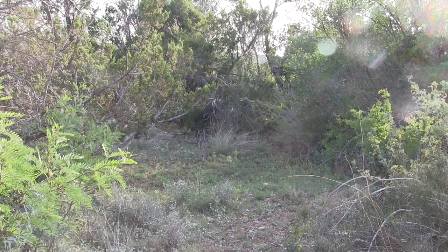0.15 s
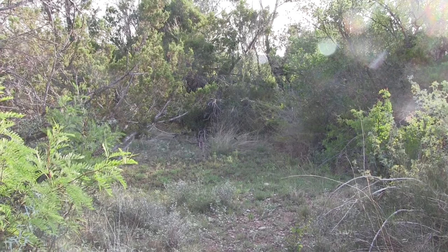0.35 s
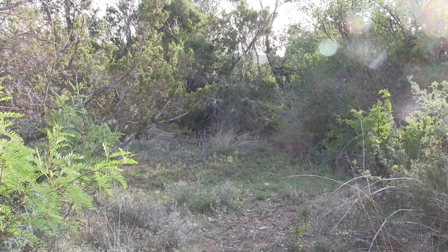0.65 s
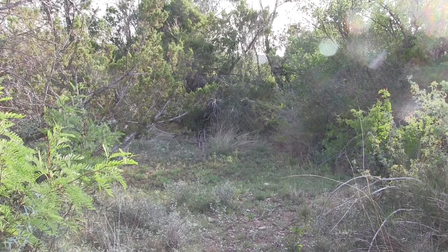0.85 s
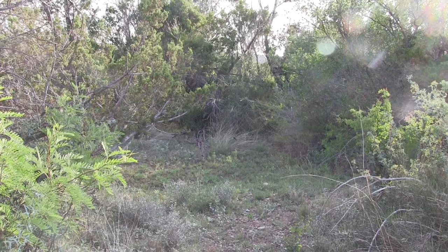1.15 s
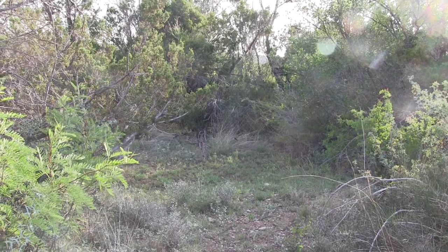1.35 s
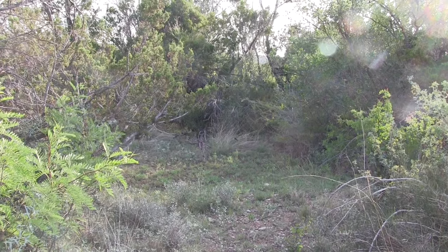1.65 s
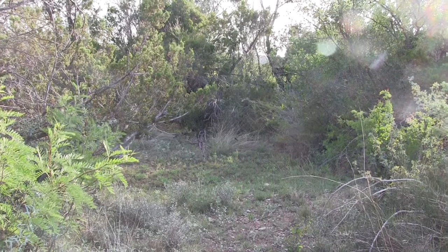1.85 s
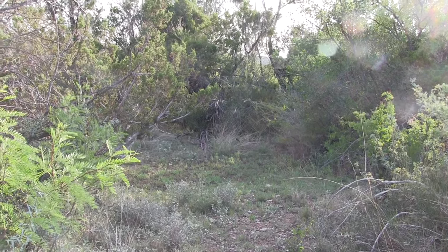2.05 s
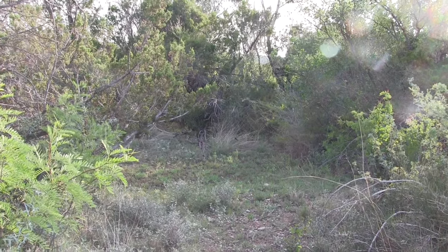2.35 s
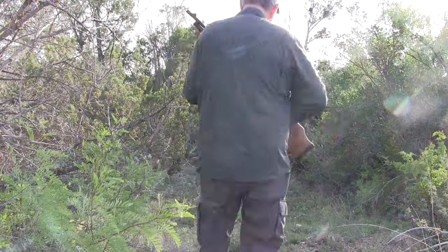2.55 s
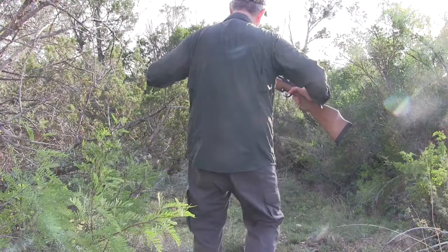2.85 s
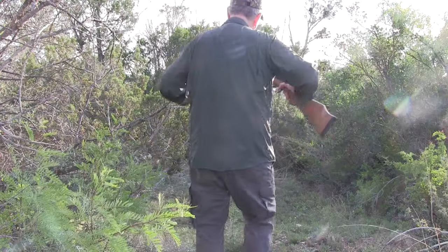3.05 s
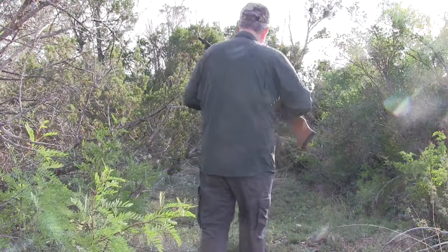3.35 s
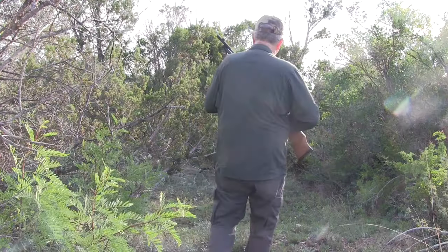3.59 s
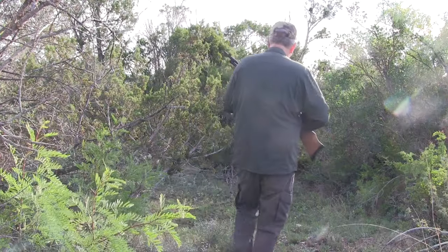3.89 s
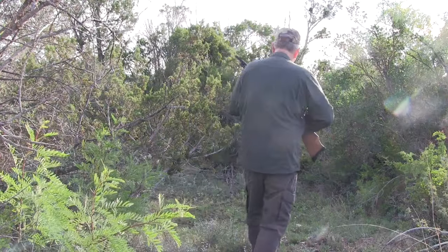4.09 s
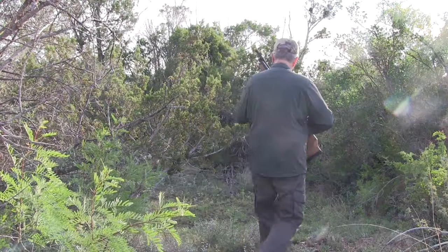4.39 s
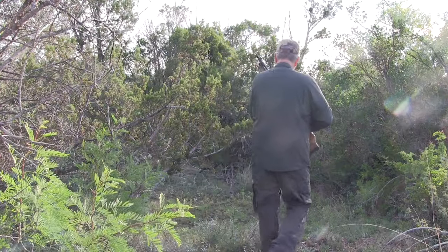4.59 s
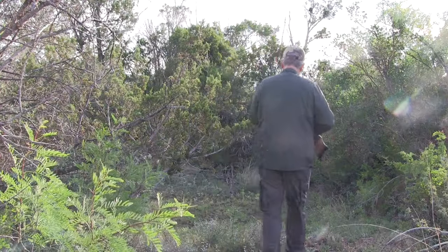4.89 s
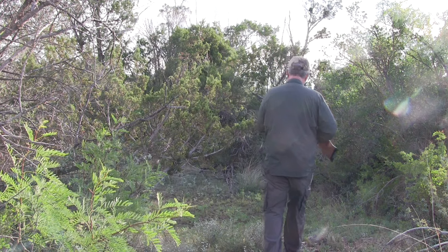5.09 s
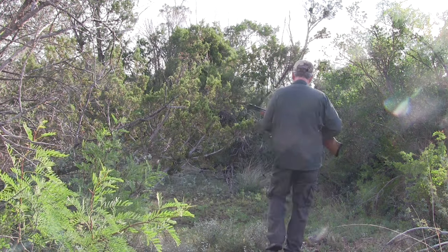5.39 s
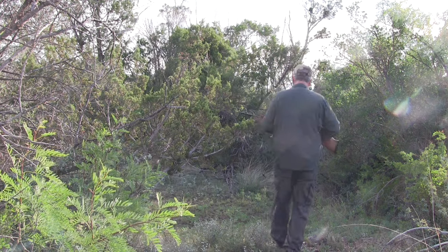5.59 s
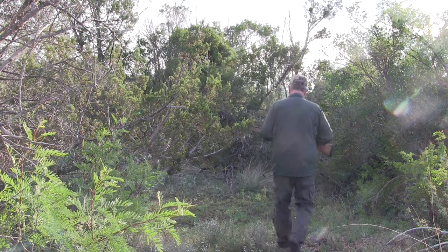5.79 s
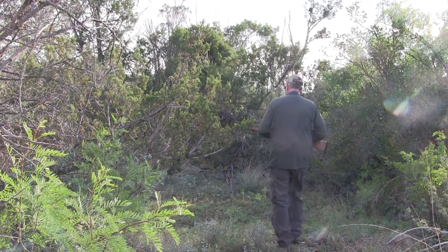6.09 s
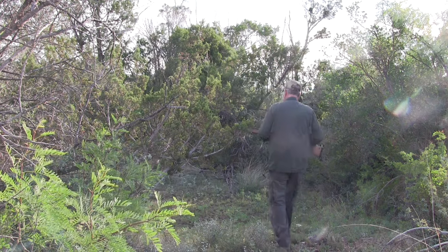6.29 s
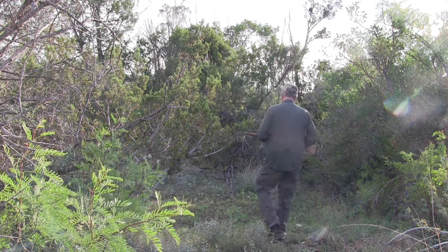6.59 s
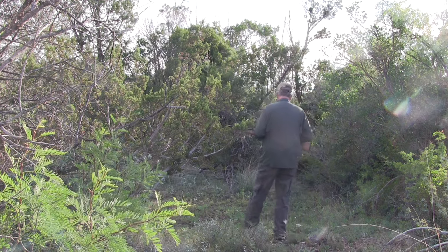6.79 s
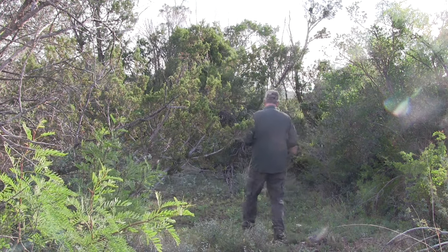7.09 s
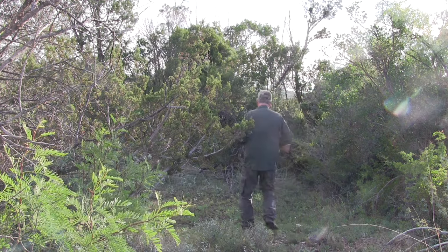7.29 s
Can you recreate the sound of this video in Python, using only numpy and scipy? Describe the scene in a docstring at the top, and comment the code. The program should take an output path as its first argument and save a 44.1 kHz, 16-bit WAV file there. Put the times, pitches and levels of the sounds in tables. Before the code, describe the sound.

Outdoors in quiet scrub, an air rifle fires at once, very close and clipped-sharp, with a quick pellet strike and a short rattle dying into the bushes. Small creaks and low wind thumps follow on the stereo microphone. After a tiny drop-out come hard reloading clacks with a brief steel ring, then boots rustle away over dry litter, twigs snapping, one loud clack, and a bird warbling faintly.

```python
"""Open brush, where an air rifle fires beside a camera: sharp pressure fronts, a strike, and noise from the scrub.
The camera mount creaks as slips drive its resonances, while slow noise and single gusts thump on both microphone ports.
Around a short drop-out the rifle is reloaded with clacks, noise blows through stock resonances and a ringing latch.
Boots walk off through dry brush in grainy noise swells and twig snaps; a songbird warbles in gliding sines."""
import sys
import numpy as np
from scipy import signal
from scipy.fft import rfft, irfft, next_fast_len
from scipy.io import wavfile
from scipy.ndimage import map_coordinates

SR = 44100
rng = np.random.default_rng(int(sys.argv[2]) if len(sys.argv) > 2 else 0)


def waveform_to_disk(signal):
    """Save audio, clipped to [-1, 1], as 16-bit WAV at the path in sys.argv[1]."""
    frames = np.transpose(np.atleast_2d(signal))
    scaled = np.clip(frames, -1, 1) * 32767
    samples = np.round(scaled).astype(np.int16)
    wavfile.write(sys.argv[1], SR, samples)


N = 328104  # length in samples

# Still open air. Each row: frequency in Hz, relative density in dB per Hz.
AIR_SPECTRUM = [(50, -21), (100, 0), (1500, -6), (13000, -21.5), (16200, -33.5)]
# Left-right correlation of air and brush. Each row: frequency in Hz, correlation.
FIELD_CORRELATION = [(60, 0.82), (400, 0.25), (2400, 0.86)]

# Wind level over time. Each row: time in seconds, level in dB.
WIND_LEVEL = [(0, -52.5), (.5, -57), (2.6, -47), (3.3, -55.5), (3.5, -66), (7.44, -71)]
# Buffeting noise. Each row: frequency in Hz, relative density in dB per Hz.
BUFFET_SPECTRUM = [(15, -39.5), (60, 0), (140, -2), (270, -19), (420, -48.5)]
# Single gusts on the ports. Each row: start in seconds, level in dB.
GUSTS = [(0.83, -36.5), (1.139, -34.5), (1.542, -32), (2.24, -29), (2.362, -33.5)]

# Shot fronts, direct and mirrored by ground and trunks. Each row: time in seconds, level in dB.
PRESSURE_FRONTS = [(.06455, -1), (.06765, -1), (.0706, -2.5), (.07855, -5.5), (.0815, -12)]
FRONT_MS = .21  # time scale of one front, milliseconds
# Low push of the escaping air: start in seconds, size before damping in dB, frequency in Hz.
AIR_PUSH = (.0645, -11, 320)
# The pellet's strike, then its thud. Each row: start in seconds, size before damping in dB, frequency in Hz.
PELLET_STRIKE = [(.1693, -9.5, 4050), (0.1715, -22, 400)]
# Noise burst on every front: boom re front in dB, treble re front in dB,
# seconds to rise 60 dB, seconds to fall 60 dB.
FRONT_TURBULENCE = (-21, -21, .002, .015)
# The hammer's travel, the rattle of the action, three clumps of near scrub, then far trees.
# Each row: peak in seconds, boom in dB, treble in dB, seconds to rise 60 dB, seconds to fall 60 dB.
SHOT_NOISES = [(.054, -29, -42, .004, .13), (.063, -19, -18.5, .003, .095), (.123, -40, -44, .03, .07),
               (.149, -34, -41, .05, .15), (.19, -37, -42, .2, .3), (.36, -60, -68, .5, .7)]
TRIGGER_S = .051  # no shot noise before this time, seconds
# Boom of the shot. Each row: frequency in Hz, relative density in dB per Hz.
BOOM_SPECTRUM = [(120, -39), (320, 2), (800, -12), (1800, 0), (3500, -5), (6500, -30)]
# Near treble of the shot. Each row: frequency in Hz, relative density in dB per Hz.
FIZZ_SPECTRUM = [(1800, -30.5), (3000, -1), (10000, 1.5), (16000, -10)]
# Left-right correlation of the shot noise. Each row: frequency in Hz, correlation.
SHOT_CORRELATION = [(2400, 0.8), (4000, 0.46), (7500, .1), (11000, 0.97)]

# Resonances of the camera mount. Each row: frequency in Hz, width in Hz, relative level in dB,
# width and level being those of a single pass.
MOUNT_MODES = [(340, 90, -1), (620, 120, 0), (790, 190, 1)]
# A mode that the slips reach to differing degrees. Each row: the same columns as the mount resonances.
UPPER_MODES = [(1590, 170, 0)]
# Slips of the joint. Each row: peak in seconds, level in dB, seconds to rise 60 dB, upper mode re slip in dB.
MOUNT_SLIPS = [(.75, -42.5, .004, -6), (.818, -46, .03, -6), (.845, -42.5, .12, -7), (1.0, -45, .015, -14),
               (1.512, -41.5, .1, -18)]
SLIP_T60_S, SETTLE_DB, SETTLE_T60_S = .1, -12, .9  # a slip dies fast (s), its settling (dB re slip) slowly (s)
# Clicks as the joint comes free. Each row: start in seconds, level in dB, frequency in Hz.
JOINT_TICKS = [(1.499, -43, 2400), (2.213, -45, 600), (2.243, -41, 700)]
# Soft rubbing on the mount. Each row: start in seconds, length in seconds.
MOUNT_RUBS = [(1.68, .14), (1.83, .27), (2.27, .23)]
RUB_DB = -58

# Knocks on the rifle. Each row: start in seconds, level in dB, 60 dB decay in seconds,
# knock frequency in Hz, treble re knock in dB.
RIFLE_CLACKS = [(2.436, -31.5, 0.024, 2330, -6), (2.586, -32, .04, 1000, -16),
                (2.613, -13, 0.058, 1450, -4.5), (2.672, -33, 0.04, 1800, -10),
                (2.751, -17, 0.065, 800, -13.5), (2.859, -13.5, 0.072, 1670, -4.5),
                (2.995, -37.5, .06, 1200, -10), (3.071, -33, 0.036, 745, -31),
                (3.363, -38, 0.042, 2180, -23), (4.628, -25, 0.27, 1500, -16),
                (4.6447, -2, 0.016, 1900, -27)]
CLACK_RISE_S = .0015
# Resonances of the wooden stock. Each row: frequency in Hz, width in Hz, relative level in dB.
STOCK_MODES = [(350, 110, -.5), (615, 140, 2), (990, 200, 1), (1275, 190, 4.5), (2200, 380, 2.5),
               (3260, 380, 0)]
# Partials of the steel latch. Each row: frequency in Hz, relative level in dB, 60 dB decay in seconds.
LATCH_PARTIALS = [(1866, -.5, 0.24), (6020, -10, .2)]
# The blow that frees the latch to ring: start in seconds, level in dB.
LATCH_BLOW = (2.861, -32)

# Shuffling while the rifle is handled. Each row: start in seconds, length in seconds,
# sole tread in dB, leaf swish in dB.
HANDLING_SHUFFLES = [(2.5, .12, -49, -49), (2.599, 0.194, -51.5, -53.5), (3.05, 0.16, -59, -58)]
# Strides through the brush. Each row: start in seconds, length in seconds, leaf swish in dB.
BRUSH_STRIDES = [(3.46, 0.16, -63), (3.603, 0.5, -53.5), (4.223, 0.36, -66.5), (4.728, .12, -57.5),
                 (5.07, .14, -63.5), (5.225, 0.16, -63), (5.54, 0.13, -59), (5.717, 0.25, -70),
                 (6.33, 0.15, -77), (6.78, 0.18, -61.5), (7.0, .18, -72)]
SOLE_DB, FARTHER_DB_PER_S = -55, -.7  # tread at the first stride, and its change as the boots walk away
# Soles on litter. Each row: frequency in Hz, relative density in dB per Hz.
TREAD_SPECTRUM = [(90, -32.5), (220, -0.5), (650, 1), (2300, -13), (6000, -34)]
# Leaves, swept by legs or returning the shot. Each row: frequency in Hz, relative density in dB per Hz.
LEAF_SPECTRUM = [(900, -29), (1600, -7), (3400, -3), (9400, -12), (16000, -28.5)]

# Twigs under the boots. Each row: start in seconds, level in dB, knock frequency in Hz.
TWIG_SNAPS = [(3.574, -28, 2200), (3.793, -23, 500), (3.916, -37, 1500), (4.283, -43, 520),
              (4.34, -37, 900), (4.385, -38, 1030), (5.083, -43, 600), (5.308, -41, 1100),
              (5.44, -44, 1440), (5.642, -44, 620), (5.862, -38, 500), (6.021, -42, 400), (6.36, -33, 600),
              (6.445, -41, 900), (7.046, -42, 470), (7.097, -42, 800)]
TWIG_RISE_S, TWIG_CYCLES = .00065, 19  # a snap falls 60 dB within so many cycles of its knock
TWIG_TREBLE_DB, DULLER_DB_PER_S = -1.5, -10  # crack re knock at the first twig, and its change over time

# Slurs that slide toward a resting pitch. Each row: start in seconds, length in seconds,
# first frequency in Hz, resting frequency in Hz, level in dB.
BIRD_SLURS = [(5.373, .026, 2800, 2810, -61), (6.948, .078, 3400, 3390, -50), (7.375, .1, 2290, 2320, -55),
              (6.098, .04, 1680, 1580, -61), (6.627, .02, 3350, 1800, -59), (5.70, .052, 2350, 1900, -61),
              (6.002, .02, 2780, 3150, -60), (6.152, .065, 2800, 1830, -57), (6.281, .027, 2720, 2150, -58),
              (5.026, .032, 4100, 2350, -65), (5.056, .022, 2800, 4700, -66),
              (6.488, .085, 2680, 1920, -58), (6.711, .08, 2620, 1920, -59), (7.084, .02, 3850, 2850, -57),
              (7.223, .095, 2560, 1950, -62)]
GLIDE_S = .022  # time constant of the slide, seconds
# Whistles bent through three pitches. Each row: start in seconds, length in seconds,
# first, middle and last frequency in Hz, level in dB.
BIRD_WHISTLES = [(4.866, .05, 4200, 4050, 3650, -69.5), (5.157, .06, 3400, 2720, 2600, -64.5),
                 (5.427, .064, 3400, 2700, 2620, -57.5), (5.972, .033, 2400, 2260, 3200, -62),
                 (5.655, .052, 2300, 2430, 2330, -53), (5.884, .07, 3000, 2330, 1930, -55),
                 (6.31, .045, 3400, 3190, 3400, -53), (6.403, .056, 4350, 3950, 3100, -63),
                 (6.65, .053, 2560, 2790, 2880, -52), (6.883, .04, 2700, 2540, 2640, -52),
                 (7.112, .062, 2700, 2720, 2900, -51)]

# The drop-out: start in seconds, end in seconds.
DROP_OUT = (2.502, 2.518)
TOP_HZ = 16100  # upper band limit


def amp(db):
    """Convert a level in dB to an amplitude ratio."""
    return 10 ** (np.asarray(db) / 20)


def unit(x):
    """Normalise x to a root-mean-square of 1."""
    return x / np.sqrt(np.mean(x ** 2) + 1e-20)


def along(points, hz):
    """Interpolate (Hz, value) points on a logarithmic frequency axis."""
    f, v = np.transpose(points)
    return np.interp(np.log(hz + 1), np.log(f + 1), v)


def curves(rows):
    """Interpolate each column after the time linearly, one value per sample."""
    s, *cols = np.transpose(rows)
    return [np.interp(np.arange(N) / SR, s, c) for c in cols]


def wobble(rate, size=N):
    """Random modulation: a smooth curve through normal deviates, rate knots a second."""
    knots = rng.standard_normal(int(size * rate / SR) + 4)
    return map_coordinates(knots, [np.arange(size) * rate / SR])


def peak(s, rise, fall):
    """Exponential growth and decay: gain 1 at s seconds, 60 dB up in rise and 60 dB down in fall seconds."""
    t = np.arange(N) / SR - s
    return amp(60 * np.minimum(t / rise, -t / fall))


def filtered(x, response):
    """Linear filtering: multiply the spectrum of x by a complex response of frequency."""
    m = next_fast_len(x.shape[-1] + 8192)
    return irfft(rfft(x, m) * response(np.fft.rfftfreq(m, 1 / SR)), m)[..., :x.shape[-1]]


def body(modes):
    """Modal superposition: causal response of (Hz, width, dB) resonances of alternating sign."""
    def response(f):
        return sum((-1) ** k * amp(db) * 1j * f * w / (c * c - f * f + 1j * f * w)
                   for k, (c, w, db) in enumerate(modes))
    return response


def rush(spectrum, alike, grain_db, rate):
    """Partly correlated stereo noise of rms 1, broken into grains by a fast random gain."""
    pair = rng.standard_normal((2, N)) * amp(grain_db * wobble(rate))

    def mid_side_gains(hz):
        turn = np.arccos(np.clip(along(alike, hz), -1, 1)) / 2  # the mid-side balance sets the correlation
        return amp(along(spectrum, hz)) * [np.cos(turn), np.sin(turn)]
    mid, side = filtered(pair, mid_side_gains)
    return unit(np.array([mid + side, mid - side]))


def add(out, s, sound):
    """Superpose a sound on out, starting at s seconds."""
    part = out[..., round(s * SR):][..., :sound.shape[-1]]
    part += sound[..., :part.shape[-1]]


def burst(rise, t60, low, treble_db):
    """Impact noise: a ragged decaying blow through a low response, its brighter crack partly unlike left to right."""
    t = np.arange(SR // 4) / SR
    shape = np.minimum(t / rise, 1) * amp(-60 * np.maximum(t - rise, 0) / t60)
    energy = np.linalg.norm(shape) / 2
    rattle_db = np.minimum(t / 0.026, 1) * 4 * wobble(130, size=len(t))  # the tail breaks up into rattles
    shape = shape * amp(rattle_db)
    knock = filtered(shape * rng.standard_normal(len(t)), low)
    hiss = rng.standard_normal(len(t)) + 0.47 * rng.standard_normal((2, len(t)))
    crack = filtered(shape * hiss, lambda f: body([(4800, 8000, 0)])(f) ** 3)
    return energy * (knock / np.linalg.norm(knock) + amp(treble_db) * crack / np.linalg.norm(crack[0]))


def open_air():
    """Diffuse background: a nearly steady broadband hiss, partly correlated between the sides."""
    return amp(-59) * rush(AIR_SPECTRUM, FIELD_CORRELATION, .3, 42)


def wind():
    """Pressure fluctuation: lumpy low noise, unlike on the two ports, and single gusts of about two cycles."""
    lumps = amp(4.5 * np.array([wobble(11), wobble(11)]))
    buffeting = unit(lumps * rush(BUFFET_SPECTRUM, [(90, .25)], 1.96, 18))
    out = amp(curves(WIND_LEVEL)[0]) * buffeting
    for s, db in GUSTS:
        gust_hz = 120 * np.exp(rng.normal(0, 0.17))
        cycles = np.arange(SR // 20) * gust_hz / SR
        phase = rng.uniform(0, 2 * np.pi) + rng.normal(0, 0.84, (2, 1))
        puff = np.exp(-((cycles - 1.2) / 0.64) ** 2) * np.sin(2 * np.pi * cycles + phase)
        add(out, s, amp(db) * puff)
    return out


def shot():
    """Impulsive radiation: steep suction and slower overshoot at each front, with noise for rattle and scrub."""
    fronts, t = np.zeros(N), np.arange(-100, 400) / SR
    for s, db in PRESSURE_FRONTS:
        u = 1000 * t / FRONT_MS
        suction = -np.exp(-u * u)
        overshoot = 0.72 * np.exp(-.5 * u) * np.cos(.5 * u)
        add(fronts, s + t[0], amp(db) * np.where(u < 0, suction, overshoot))
    for s, db, hz in PELLET_STRIKE + [AIR_PUSH]:
        cycles = np.arange(SR // 50) * hz / SR
        add(fronts, s, -amp(db) * np.exp(-.9 * cycles) * np.sin(2 * np.pi * cycles))
    # a small muzzle sends out no deep bass
    fronts = filtered(fronts, lambda hz: (1j * hz / (150 + 1j * hz)) ** 2)

    boom_db, treble_db, rise, fall = FRONT_TURBULENCE
    bursts = [(s, db + boom_db, db + treble_db, rise, fall) for s, db in PRESSURE_FRONTS]

    def envelopes(rows):
        return sum(amp([[boom], [treble]]) * peak(s, up, down) for s, boom, treble, up, down in rows)
    near_boom, near_treble = envelopes(SHOT_NOISES[:2] + bursts)
    far_boom, far_treble = envelopes(SHOT_NOISES[2:])
    noise = (near_boom + far_boom) * rush(BOOM_SPECTRUM, SHOT_CORRELATION, 3.2, 200)
    noise = noise + near_treble * rush(FIZZ_SPECTRUM, SHOT_CORRELATION, 0.9, 417)
    noise = noise + far_treble * rush(LEAF_SPECTRUM, SHOT_CORRELATION, 2, 417)  # leaves return it duller
    return fronts + noise * (np.arange(N) > TRIGGER_S * SR)


def creak():
    """Stick-slip friction: uneven slips of the joint drive mount resonances that each come and go on their own."""
    slips = rng.standard_normal((2, N)) * amp(2.5 * wobble(120))

    def driven(modes):
        total = 0
        for mode in modes:
            force = amp(2.5 * wobble(25)) * (slips + .3 * slips[::-1])  # some of each side leaks across
            total = total + filtered(force, lambda f: body([mode])(f) ** 2)
        return unit(total)
    low, upper = driven(MOUNT_MODES), driven(UPPER_MODES)
    low_gain, upper_gain = np.zeros((2, N))
    for s, db, rise, upper_db in MOUNT_SLIPS:
        envelope = peak(s, rise, SLIP_T60_S) + amp(SETTLE_DB) * peak(s, rise, SETTLE_T60_S)
        low_gain += amp(db) * envelope
        upper_gain += amp(db + upper_db) * envelope
    rub = np.zeros(N)
    for s, length in MOUNT_RUBS:
        add(rub, s, amp(RUB_DB) * np.sqrt(np.hanning(int(length * SR))))
    rubbing = rub * unit(filtered(slips, body(MOUNT_MODES + UPPER_MODES)))
    out = low_gain * low + upper_gain * upper + rubbing
    for s, db, hz in JOINT_TICKS:
        tick = burst(TWIG_RISE_S, .02, lambda f: body([(hz, 2 * hz, 0)])(f) ** 2, -25)
        add(out, s, amp(db) * tick)
    return out


def rifle():
    """Struck-body resonance: knocks shake the stock, most near their own pitch; one blow rings the steel latch."""
    out, t = np.zeros((2, N)), np.arange(SR // 4) / SR
    for s, db, t60, hz, treble_db in RIFLE_CLACKS:
        wood = lambda f: (body(STOCK_MODES)(f) + 0.17) * body([(hz, 1.9 * hz, 0)])(f) ** 2
        add(out, s, amp(db) * burst(CLACK_RISE_S, t60, wood, treble_db))
    ring = np.zeros(len(t))
    for hz, level, decay in LATCH_PARTIALS:
        level_db = level - 60 * t / decay + hz / 1500 * wobble(60, size=len(t))
        phase = 2 * np.pi * hz * t + hz / 5000 * wobble(300, size=len(t))
        ring += amp(level_db) * np.sin(phase)
    start, db = LATCH_BLOW
    add(out, start, amp(db) * ring)
    return out


def scrub(x, t60):
    """Diffuse scattering: bushes return a dull, delayed, dying tail, unlike on the two sides."""
    t = np.arange(SR // 2) / SR
    tail = filtered(rng.standard_normal((2, len(t))) * amp(-60 * t / t60), body([(1940, 13400, 0)]))
    delayed = np.pad(x, (700, 0))[None]  # 700 samples of delay
    return signal.fftconvolve(delayed, tail / np.linalg.norm(tail[0]), axes=1)[:, :N]


def brush():
    """Granular friction: soles grind the litter and legs sweep the leaves in grainy swells."""
    tread, swish = np.zeros((2, N))
    first_s = BRUSH_STRIDES[0][0]
    steps = [(s, length, SOLE_DB + FARTHER_DB_PER_S * (s - first_s), db) for s, length, db in BRUSH_STRIDES]
    for s, length, tread_db, swish_db in HANDLING_SHUFFLES + steps:
        swell = np.sin(np.pi * np.linspace(0, 1, int(length * SR)) ** 0.83)
        add(tread, s, amp(tread_db) * swell)
        add(swish, s, amp(swish_db) * swell)
    grind = tread * rush(TREAD_SPECTRUM, FIELD_CORRELATION, 6, 300)
    sweep = swish * rush(LEAF_SPECTRUM, FIELD_CORRELATION, 3.0, 500)
    return grind + sweep


def twigs():
    """Brittle fracture: dry snaps, each a knock with a crack on top, duller as the boots walk off."""
    out = np.zeros((2, N))
    for s, db, hz in TWIG_SNAPS:
        treble_db = TWIG_TREBLE_DB + DULLER_DB_PER_S * (s - TWIG_SNAPS[0][0])
        knock = lambda f: body([(hz, 1.4 * hz, 0)])(f) ** 2
        add(out, s, amp(db) * burst(TWIG_RISE_S, TWIG_CYCLES / hz, knock, treble_db))
    return out


def bird():
    """Frequency modulation: swelling and fading sines; slurs relax toward a pitch, whistles follow a parabola."""
    out, notes = np.zeros(N), []
    for s, length, first_hz, rest_hz, db in BIRD_SLURS:
        slide = np.exp(-np.arange(int(length * SR)) / (GLIDE_S * SR))
        notes.append((s, db, .55, rest_hz + (first_hz - rest_hz) * slide))
    for s, length, first_hz, mid_hz, last_hz, db in BIRD_WHISTLES:
        u = np.linspace(-1, 1, int(length * SR))
        slope = (last_hz - first_hz) / 2
        bend = (first_hz + last_hz) / 2 - mid_hz
        notes.append((s, db, .8, mid_hz + slope * u + bend * u ** 2))
    for s, db, late, hz in notes:  # the smaller late, the earlier the note peaks
        swell = np.abs(np.sin(np.pi * np.linspace(0, 1, len(hz)) ** late)) ** .7
        gain = np.sqrt(2) * amp(db + 2.5 * wobble(80, size=len(hz)))
        unsteady_hz = hz * (1 + .007 * wobble(70, size=len(hz)))
        add(out, s, gain * swell * np.sin(2 * np.pi * np.cumsum(unsteady_hz) / SR))
    return out


def scene():
    """Superposition of all sources: near knocks about the middle, the bird a little right."""
    near, song = rifle() + twigs(), bird()
    answer = amp(-20) * scrub(near.mean(axis=0) + song, t60=.33)
    placed_song = song * amp([[-.6], [.6]])
    return open_air() + wind() + shot() + creak() + near + answer + brush() + placed_song


def record(dry):
    """Gating, saturation and band limiting: a short drop-out, full-scale clipping and a sharp upper cutoff."""
    t = np.arange(N) / SR
    outside_s = np.maximum(DROP_OUT[0] - t, t - DROP_OUT[1])
    kept = np.clip(outside_s / .002, .003, 1)  # 2 ms edges, a faint remainder inside
    return filtered(np.clip(dry * kept, -1, 1), lambda hz: hz < TOP_HZ)


dry = scene()
out = record(dry)
waveform_to_disk(out)
```